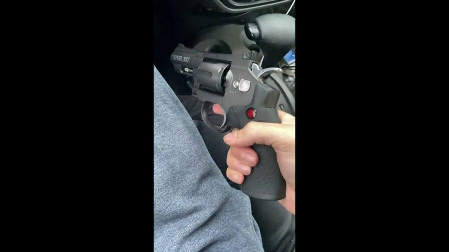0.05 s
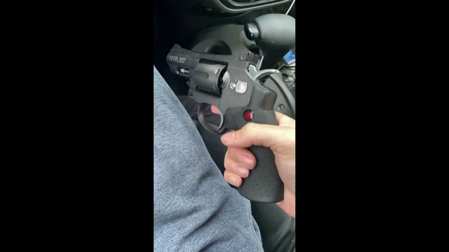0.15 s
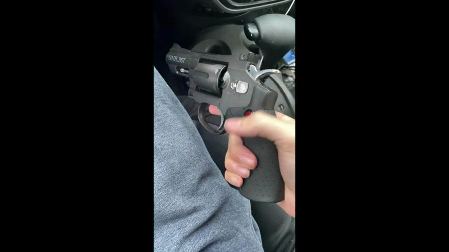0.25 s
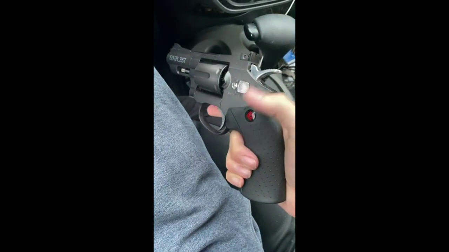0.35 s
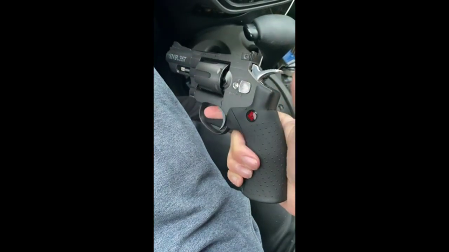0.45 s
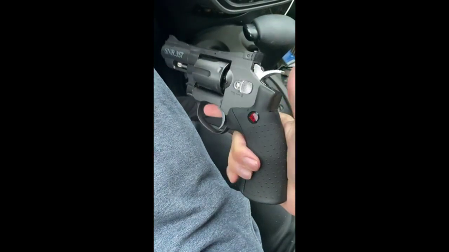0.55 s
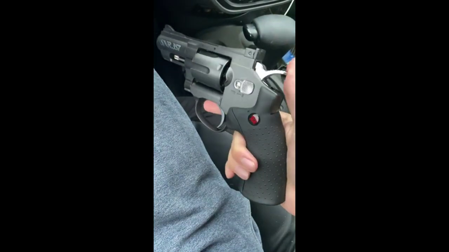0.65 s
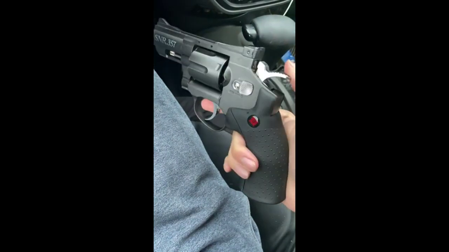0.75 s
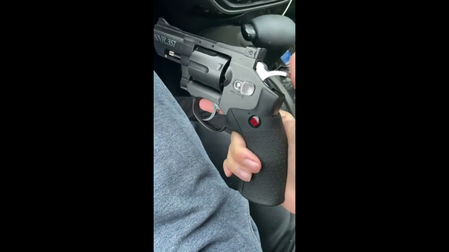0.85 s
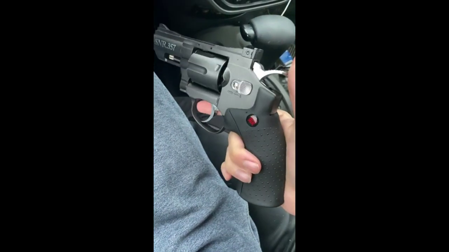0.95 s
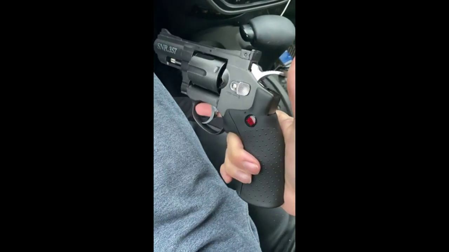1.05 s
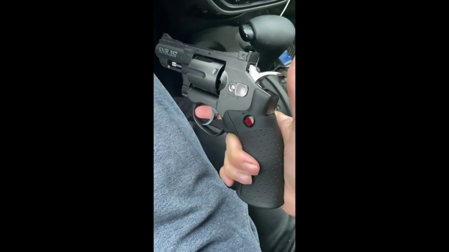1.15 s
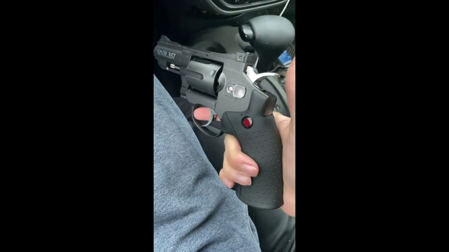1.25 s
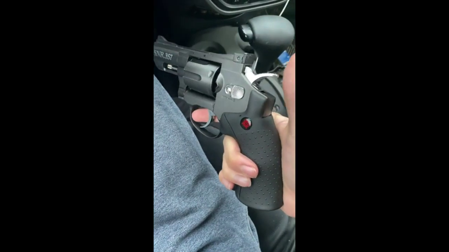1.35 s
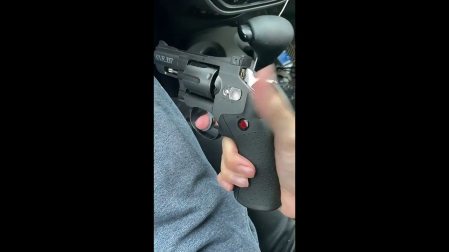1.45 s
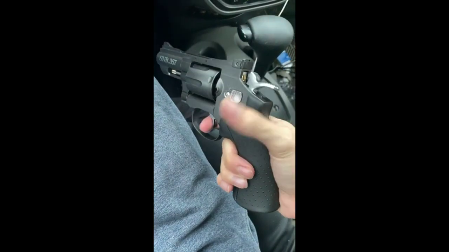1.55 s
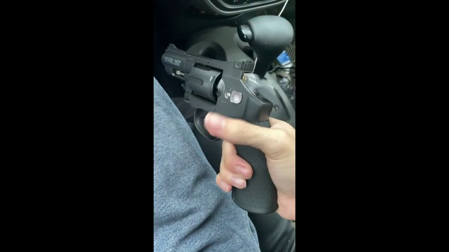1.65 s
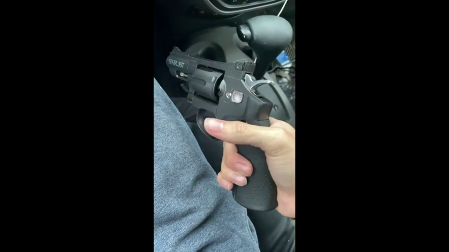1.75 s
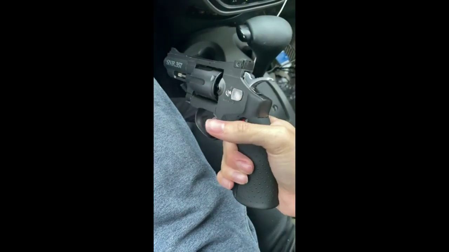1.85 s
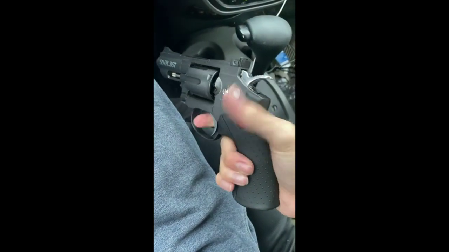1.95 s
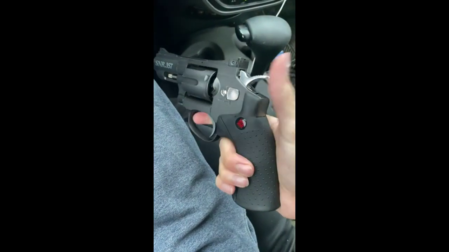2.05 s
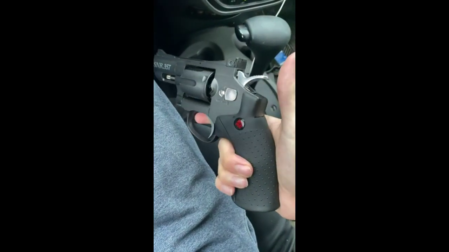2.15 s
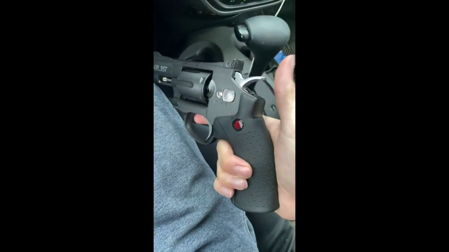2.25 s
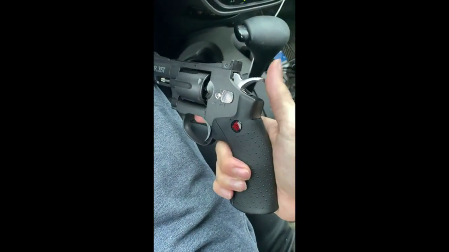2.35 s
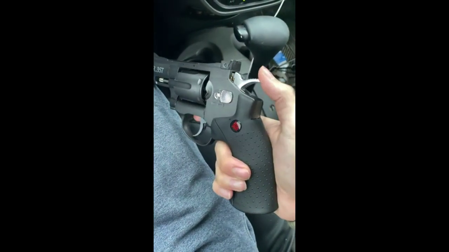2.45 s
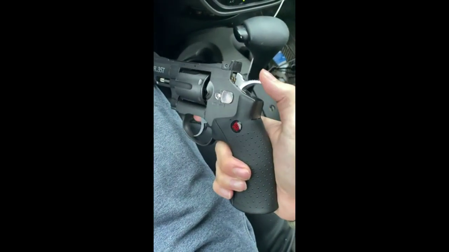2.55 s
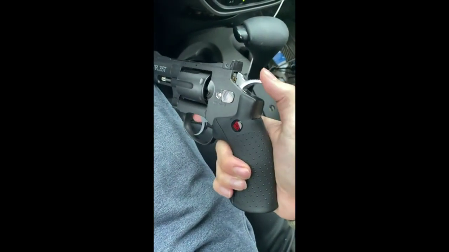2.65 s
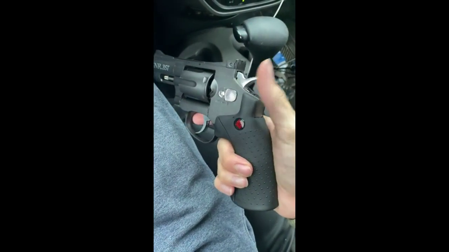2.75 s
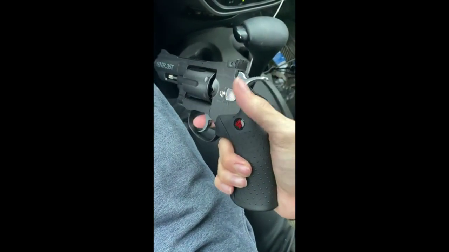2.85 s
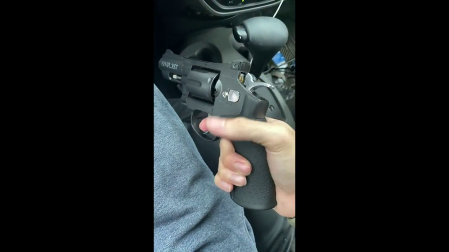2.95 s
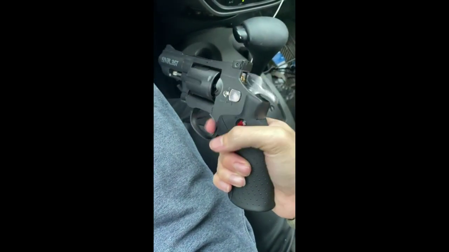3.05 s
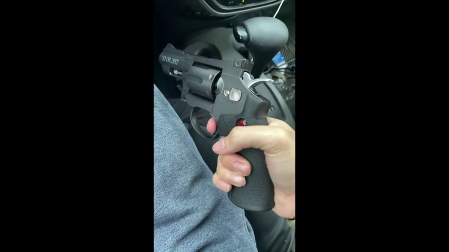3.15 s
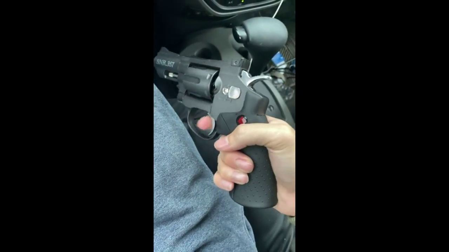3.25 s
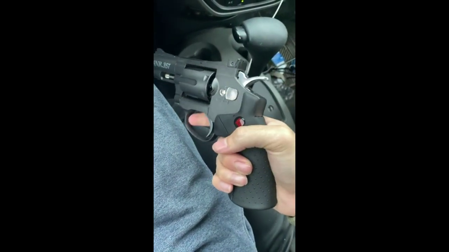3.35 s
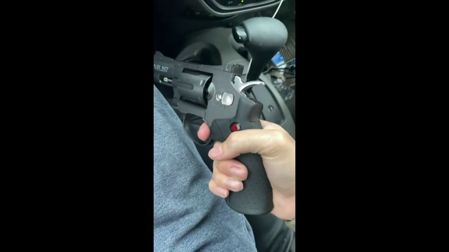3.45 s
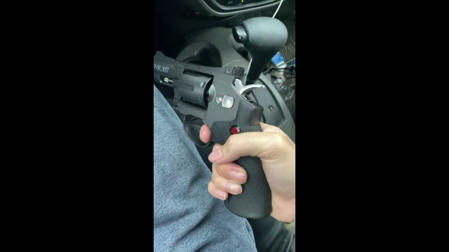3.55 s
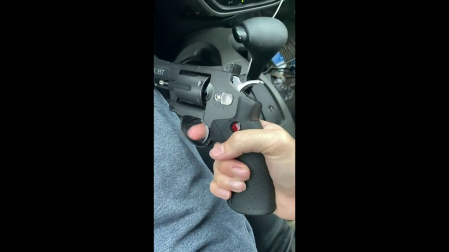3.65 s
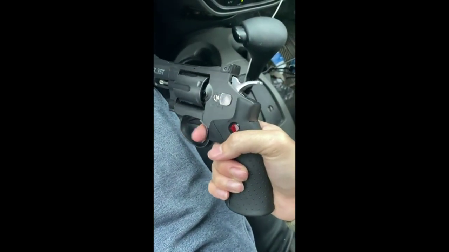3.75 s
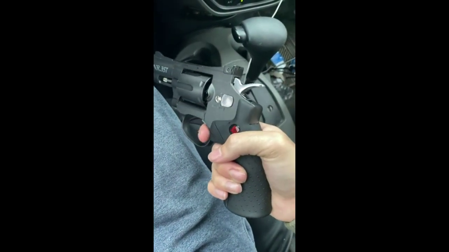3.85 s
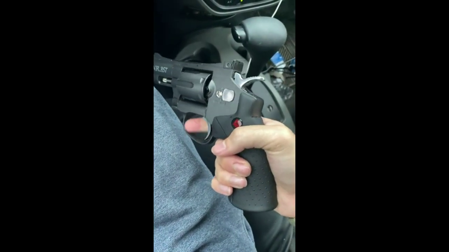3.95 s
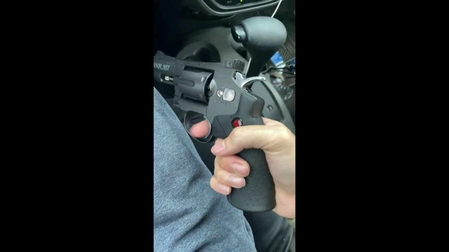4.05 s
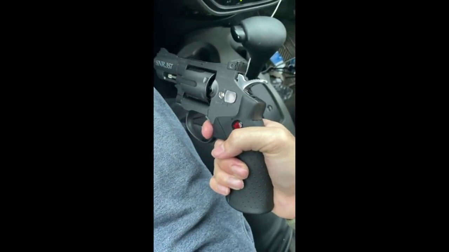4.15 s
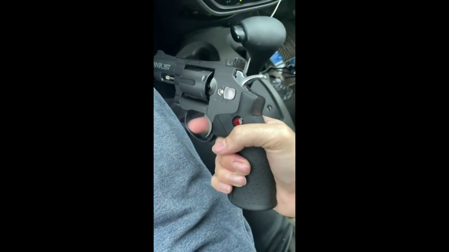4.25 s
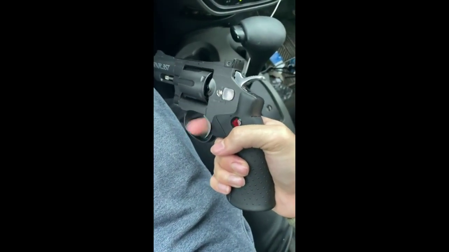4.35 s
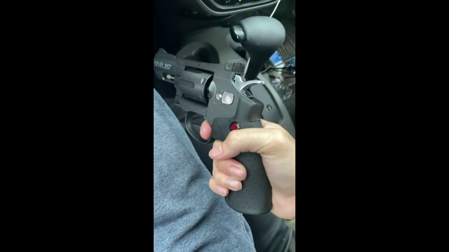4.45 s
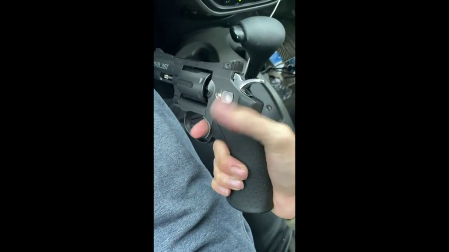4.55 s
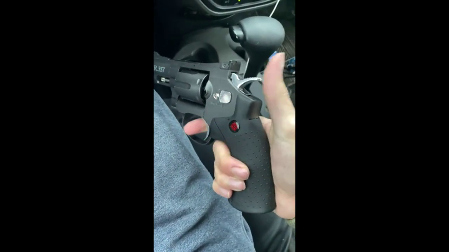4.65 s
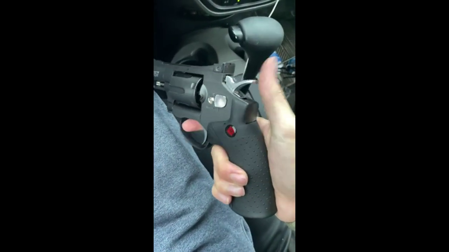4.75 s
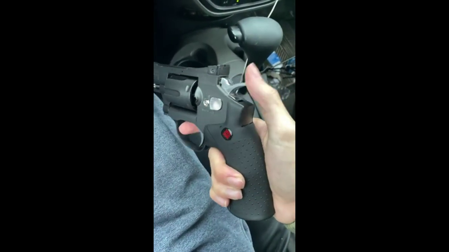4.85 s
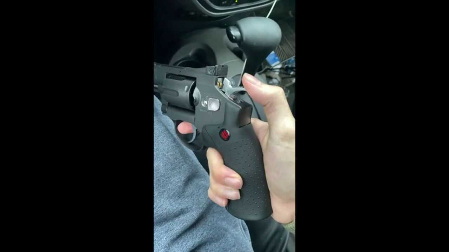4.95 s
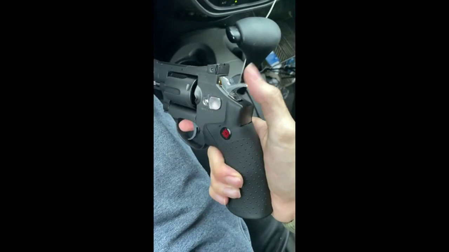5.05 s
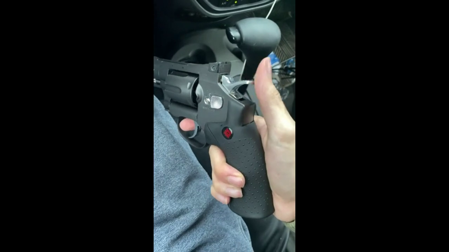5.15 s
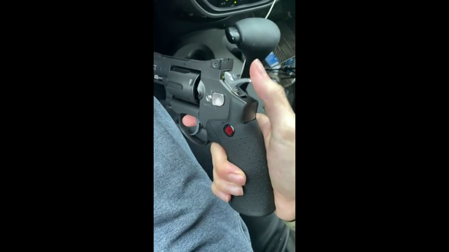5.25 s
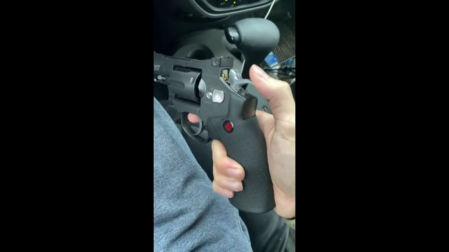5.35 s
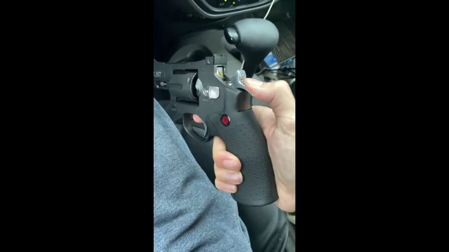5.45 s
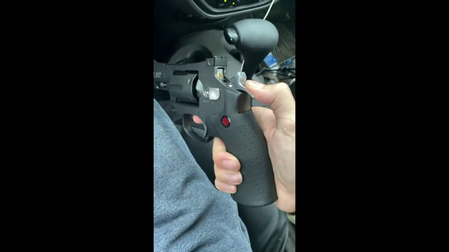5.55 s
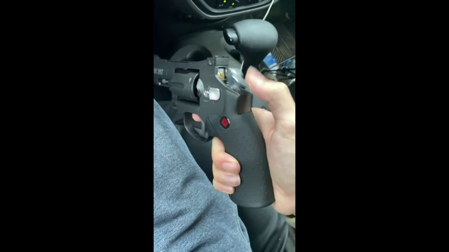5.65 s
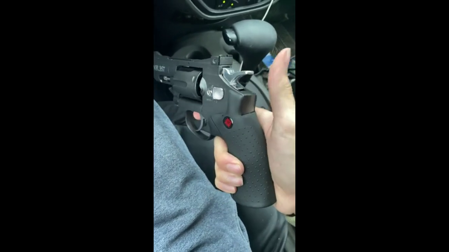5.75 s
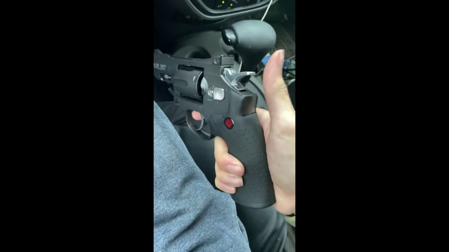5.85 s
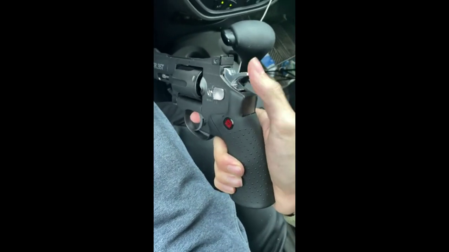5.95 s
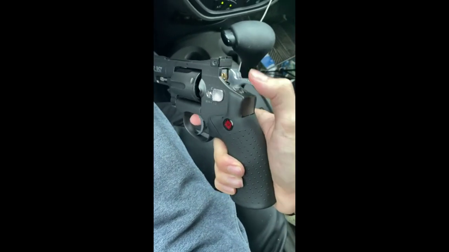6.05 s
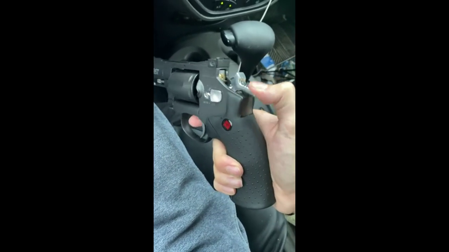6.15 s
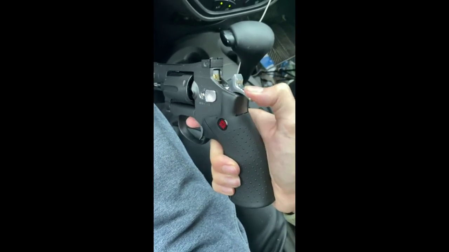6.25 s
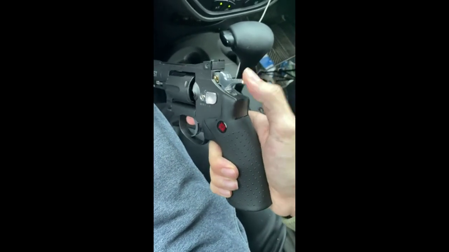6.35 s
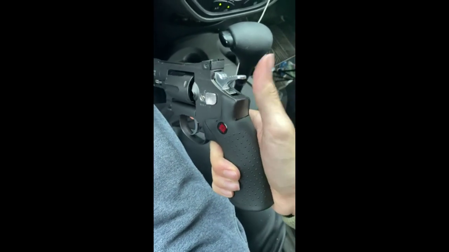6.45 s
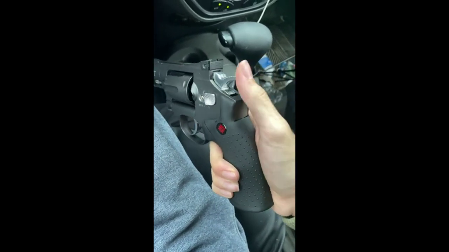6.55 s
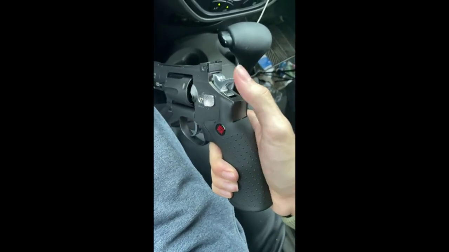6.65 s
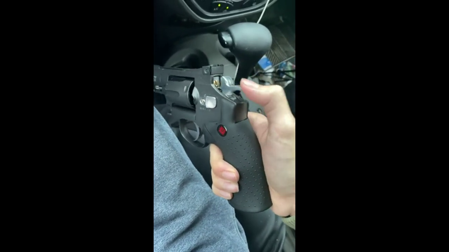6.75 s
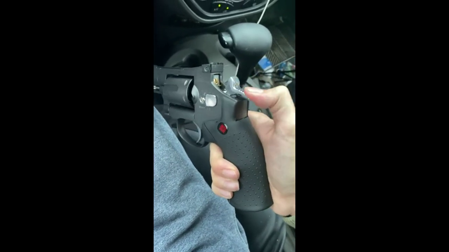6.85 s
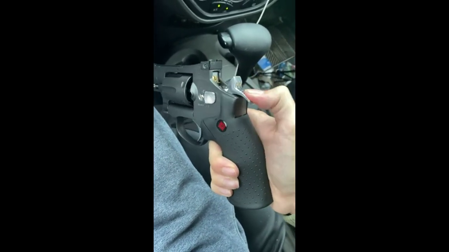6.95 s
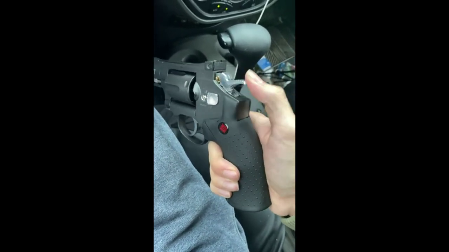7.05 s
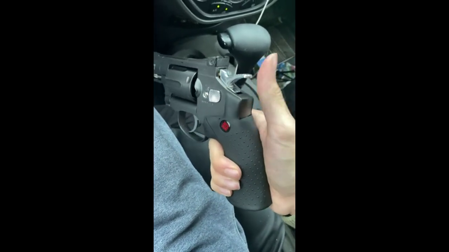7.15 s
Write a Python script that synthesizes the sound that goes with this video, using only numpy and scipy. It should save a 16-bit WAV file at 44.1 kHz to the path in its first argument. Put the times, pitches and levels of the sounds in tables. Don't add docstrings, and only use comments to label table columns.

```python
import sys
import numpy as np
from scipy import signal
from scipy.fft import rfft, irfft
from scipy.io import wavfile
from scipy.ndimage import uniform_filter1d

SR = 44100
rng = np.random.default_rng(int(sys.argv[2]) if len(sys.argv) > 2 else 0)


def convert_level_to_amplitude(level_db):
    exponent = np.asarray(level_db, float) / 20
    return 10 ** exponent


def materialize(psi):
    bounded = np.clip(np.atleast_2d(psi).T, -1, 1)
    quanta = np.round(bounded * 32767).astype(np.int16)
    wavfile.write(sys.argv[1], SR, quanta)


N = 317520

# frequency in Hz, density in dB per Hz.
CONTACT_COLOUR = [(180, -49.5), (300, -22.5), (1270, -14.5), (1800, -10), (2900, -2.5), (4200, -8),
                  (5740, -3.5), (7260, -8.5), (9650, -10), (12400, -15), (13700, -11), (15200, -7),
                  (16500, -31)]


def curve(table, hz, order=1):
    table = np.array(table)
    return np.interp(np.log(hz + 1), np.log(table[:, 0]), table[:, order])


def unit(x):
    return x / np.sqrt(np.mean(np.abs(x) ** 2))


def decay(age, t60):
    return np.exp(-np.log(1000) * age / t60)


def drift(rate):
    noise = rng.standard_normal(N) + 1j * rng.standard_normal(N)
    pole = np.exp(-2 * np.pi * rate / SR)
    return unit(signal.lfilter([1], [1, -2 * pole, pole ** 2], noise))


def air():
    # frequency in Hz, density in dB per Hz.
    air_colour = [(22, -10.5), (34, -13), (50, -2), (90, -2), (200, -11), (330, -16), (420, -14),
                  (650, -24), (1050, -27.5), (2000, -40), (3300, -48), (5000, -67), (7400, -71.5),
                  (10000, -56), (13000, -66.5), (16000, -86)]
    # frequency in Hz, likeness -1..1, left minus right in dB.
    port_likeness = [(61, 0.57, 0.9), (132, 1, -0.5), (292, 0.7, -0.5), (420, 0.55, -5), (700, -0.31, 0.5),
                     (1267, -0.33, 4), (2400, 0.36, -2.5), (7200, -0.11, 0)]
    hz = np.fft.rfftfreq(N, 1 / SR)
    like = np.clip(curve(port_likeness, hz, order=1), -1, 1)
    lean = convert_level_to_amplitude(curve(port_likeness, hz, order=2) / 2)
    mid, side = rfft(rng.standard_normal((2, N)))
    mid = mid * np.sqrt(1 + like)
    side = side * np.sqrt(1 - like)
    both = np.array([(mid + side) * lean, (mid - side) / lean]) * convert_level_to_amplitude(curve(air_colour, hz))
    out = 0
    for centre in 60 * 2. ** np.arange(9):
        octaves_away = np.abs(np.log2(np.clip(hz, 60, 15360) / centre))
        region = irfft(both * np.clip(1 - octaves_away, 0, 1), N)
        flicker_db = (2.5 + centre / 4000) * drift(5.2).real
        out = out + region * convert_level_to_amplitude(flicker_db)
    return convert_level_to_amplitude(-44) * unit(out)


def engine():
    # frequency in Hz, level in dB rms, wavering share 0-1, waver rate per second.
    drone_lines = [(25, -52, .4, 3), (48.22, -27.5, 0.16, 12), (71.36, -40, 0.7, 1.4),
                   (97.1, -50.5, 1, 2.5), (123.7, -50, 0.3, 1.9), (143, -55, 0.7, 1.3),
                   (167.8, -55, 0.4, 2.5), (196, -59, .6, 3.8), (246.9, -63, 0.1, 9),
                   (375.2, -53.5, .5, 12)]
    out = 0
    speed = np.cumsum(1 + .0015 * drift(.7).real) / SR
    for hz, db, share, rate in drone_lines:
        pan_db = -5 * (hz / 374) ** 2
        share = np.clip(share, 0, 1)
        size = np.sqrt(1 - share ** 2) + share * drift(rate)
        phase = 2 * np.pi * (hz * speed + rng.random())
        line = np.sqrt(2) * (size * np.exp(1j * phase)).real
        out = out + convert_level_to_amplitude(db + np.array([[pan_db], [-pan_db]]) / 2) * line
    return out


def phone_bumps():
    # start in seconds, level in dB, frequency in Hz, t60 in seconds.
    bumps = [
        (6.786, -17.5, 69.1, .15),
        (7.16, -14, 68, 0.073),
    ]
    t, out = np.arange(N) / SR, 0
    for s, db, hz, t60 in bumps:
        age = np.maximum(t - s, 0)
        onset = 1 - np.exp(-age / 0.0039)
        out = out + convert_level_to_amplitude(db) * np.sin(2 * np.pi * hz * age) * decay(age, t60) * onset
    return out


def jolts(push_ms=.7):
    # start in seconds, level in dB.
    landings = [
        (.689, -33),
        (1.62, -30),
        (2.445, -28),
        (3.05, -29),
        (4.841, -25),
        (6.85, -32.5),
    ]
    t, out = np.arange(N) / SR, 0
    for s, db in landings:
        age = np.clip(t - s, 0, .1) * 1000 / push_ms
        out = out + convert_level_to_amplitude(db) * np.e * age * (2 - age) * np.exp(-age)
    return out * convert_level_to_amplitude(np.array([[-2.5], [2.5]]))


def scrapes():
    # start in seconds, release in seconds, level at release in dB.
    slides = [(0.666, 0.682, -29.5), (1.427, 1.452, -72), (1.577, 1.588, -51), (2.421, 2.438, -35),
              (2.993, 3.022, -65), (4.823, 4.834, -29), (5.237, 5.261, -45), (5.395, 5.414, -29),
              (5.592, 5.65, -25), (5.965, 6.006, -54), (6.634, 6.645, -67), (6.981, 7.016, -40.5)]
    # start in seconds, end in seconds, level in dB.
    rustles = [(0.842, 0.917, -87), (1.473, 1.567, -79), (2.682, 2.91, -82), (4.81, 4.829, -63.5),
               (4.947, 5.2, -86.5), (5.26, 5.404, -74), (5.701, 5.95, -92), (6.04, 6.11, -77),
               (6.19, 6.294, -78), (6.386, 6.592, -88), (6.727, 6.797, -69), (6.9, 6.98, -78),
               (7.076, 7.146, -78)]
    # start in seconds, end in seconds, level in dB.
    drags = [(5.997, 6.034, -57), (6.11, 6.165, -41.5), (6.287, 6.352, -46), (6.648, 6.665, -57),
             (7.016, 7.054, -44)]
    strokes = [(start, end, -67, db) for start, end, db in slides]
    strokes += [(start, end, db, db) for start, end, db in [*rustles, *drags]]
    t, size = np.arange(N // 16 + 1) * 16 / SR, 0
    for start, end, start_db, end_db in strokes:
        times = [start - .004, start, end, end + .006]
        size = size + convert_level_to_amplitude(np.interp(t, times, [-110, start_db, end_db, -110]))
    grit = rng.standard_normal((3, N))
    hz = np.fft.rfftfreq(N, 1 / SR)
    colour = convert_level_to_amplitude(curve(CONTACT_COLOUR, hz)) / (1 + (hz / 7000) ** 2)
    hiss = irfft(rfft(grit[:2]) * colour, N)
    lumps = convert_level_to_amplitude(22.0 * uniform_filter1d(grit[2], size=60))
    return unit(hiss) * np.repeat(size, 16)[:N] * lumps


def rings():
    # start in seconds, frequency in Hz, level in dB, t60 in seconds.
    free_rings = [(.689, 2170, -29, 0.078), (1.61, 12500, -26.5, 0.047), (1.621, 2126, -24.5, 0.1),
                  (2.445, 2214, -29.5, 0.06), (3.051, 2100, -20.5, 0.072), (4.84, 5300, -64, .7),
                  (5.65, 5260, -67, 0.39), (6.155, 5250, -67, 0.36), (5.421, 12510, -19, 0.12),
                  (5.646, 2105, -22.5, 0.048), (6.347, 2135, -33, 0.048), (1.612, 5800, -26, 0.03),
                  (2.915, 5580, -24, 0.028), (3.042, 5500, -24, .03), (5.645, 6010, -17, 0.03),
                  (6.153, 4960, -29, 0.035), (6.848, 5800, -20, .03)]
    out, age = np.zeros(N + 22050), np.arange(22050) / SR
    flutter = drift(160)
    for s, hz, db, t60 in free_rings:
        at = int(s * SR)
        wobble = 1 + np.roll(flutter, -at)[:len(age)] * (2900 / hz) ** 2
        swing = (wobble * np.exp(2j * np.pi * hz * age)).imag
        out[at:at + len(age)] += convert_level_to_amplitude(db) * swing * decay(age, t60) * (1 - np.exp(-age / .001))
    return np.array([out[:N] * convert_level_to_amplitude(-1.5), np.roll(out, shift=2)[:N]])


def contacts():
    # start in seconds, blow level in dB,
    # frame thud in dB relative, bright tick in dB relative, scrape length in ms.
    snaps = [(0.6825, -23, -6.5, 10, .8), (0.6846, -20, -20.5, 6, 1.5), (0.6873, -13.5, -5, 3.5, 3.6),
             (1.6075, -22, -7.5, 1.5, 1.2), (1.6112, -15.5, 0, 9.5, 1.7), (1.6198, -12.5, -7, 2, 2.4),
             (1.6538, -28.5, -1.5, -9.5, 1.8), (2.4415, -14.5, -10, 5, 1.1), (2.4443, -13.5, -7, -1.5, 1.8),
             (3.0231, -26.5, -6.5, 3, 2.5), (3.0374, -25, -1, 6, 1.9), (3.0405, -14.5, -3.5, 5, .7),
             (3.0503, -11.5, -5.5, 3, 1.9), (3.0814, -28.5, 4.5, -14, 1.4), (4.8354, -17, 0.5, 5.5, 1.3),
             (4.838, -16, -4, 8.5, 5.2), (5.4205, -24, 2, 13.5, 1.7), (5.423, -16, 0, -14, 3),
             (5.6402, -29.5, -5, 14.5, 1.3), (5.6455, -19, -3, -25.5, 2.2), (6.8425, -32, -2.5, 9, 1.1),
             (6.8468, -14.5, -8, 2, 1.6), (6.8543, -19, -1.5, -5, 1.1)]
    # start in seconds, level in dB, bright tick in dB relative.
    catches = [(0.824, -40.5, 3.5), (0.8333, -36, -14), (1.4449, -43, 8), (1.4534, -37.5, 4),
               (1.5907, -26.5, 3.5), (1.6251, -19, -3.5), (2.6712, -44, -1.5), (2.9122, -35.5, 2.5),
               (2.9152, -35.5, 4.5), (5.0236, -46, 4.5), (5.0582, -40.5, 0), (5.2568, -43, -9),
               (5.4022, -33, 1.5), (5.6148, -35, 2), (5.6339, -33, 4.5), (6.0005, -31, 7),
               (6.115, -35.5, 8.5), (6.13, -31.5, -20.5), (6.1364, -20.5, 2.5), (6.153, -26, -8.5),
               (6.2928, -36.5, 6.5), (6.3057, -35.5, 9.5), (6.3187, -30, -1.5), (6.3407, -26, 2.5),
               (6.6625, -39, -12.5), (6.6862, -42, 14), (6.7994, -37, 4), (7.0142, -31, 12),
               (7.0388, -35, 3), (7.0545, -36, 1)]
    # start in seconds, level in dB, bright tick in dB relative.
    taps = [(0.252, -69.5, 5), (1.4626, -46, -2.5), (1.5542, -61.5, 5), (1.7795, -58, -1.5),
            (2.4096, -58, -9), (2.622, -60, -19), (2.6573, -54, -4), (2.8318, -49, -14.5),
            (3.1802, -53, 0.5), (3.4675, -56, 2), (3.5842, -51.5, -0.5), (3.775, -57.5, 0),
            (3.879, -56.5, -7), (3.9642, -55.5, 0.5), (4.0805, -58, -3), (4.1899, -55.5, -1.5),
            (4.2727, -56.5, 2.5), (4.3795, -63, 1.5), (4.4899, -60.5, 6), (5.05, -51, -16),
            (5.2911, -50, -6), (5.3044, -62, -19), (5.332, -52, 2.5), (5.9386, -63, -6),
            (5.9801, -44.5, -7), (6.032, -46, -13), (6.6503, -47, -3), (6.709, -47.5, -16),
            (6.7217, -50.5, -20), (7.081, -52, -7)]
    light = [(s, db, -2.5, tick_db, 0.89) for s, db, tick_db in catches]
    light += [(s, db, 4.5, tick_db, 0.92) for s, db, tick_db in taps]
    gaps = .006 * (.5 + rng.random(len(light)))
    rebounds = []
    for (s, db, thud_db, tick_db, ms), gap in zip(light, gaps):
        rebounds.append((s + gap, db - 8.5, thud_db, tick_db - 8, ms))
    return [*snaps, *light, *rebounds]


def ring(modes, t, chance, scatter_db=3.0, detune=.01):
    hz, db, t60 = np.transpose(modes)[:, :, None]
    gain_chance = chance[:len(modes), None]
    pitch_chance = chance[10:10 + len(modes), None]
    tones = np.sin(2 * np.pi * hz * (1 + detune * pitch_chance) * t)
    waves = convert_level_to_amplitude(db + scatter_db * gain_chance) * tones * decay(t, t60)
    return waves.sum(axis=0)


def action(lead_db=-26, rattle_db=-9, rattle_t60=0.086, left_db=-1.5, metal_t60=.04, metal_db=3.5):
    # frequency in Hz, level in dB, t60 in seconds.
    frame_modes = [(1050, -11, .02), (2130, -7, .035), (2450, -9, .025), (2760, -11, .025)]
    cylinder_modes = [(4160, -11, .015), (5290, -9, .02), (5800, -11, .012)]
    hammer_modes = [(9660, -11, 0.0042), (12500, -11.5, 0.025)]
    # frequency in Hz, lead in radians.
    port_lead = [(0, -3.5), (600, 2.5), (1290, 0.08), (2150, 0.14), (2930, 0.5), (3880, 1.5), (5600, 1.27),
                 (6550, -3), (8100, 4), (9470, 5), (11000, 7), (13000, 7), (13900, 7.5), (16400, 14)]
    out, t = np.zeros((2, N + 9000)), np.arange(4096) / SR
    hz = np.fft.rfftfreq(8192, 1 / SR)
    colour = convert_level_to_amplitude(curve(CONTACT_COLOUR, hz))
    lead = np.interp(hz, *np.transpose(port_lead))
    left = convert_level_to_amplitude(left_db / 2) * np.exp(.5j * lead)
    right = convert_level_to_amplitude(-left_db / 2) * np.exp(-.5j * lead)
    ports = np.array([left, right])
    rattle_dulling = np.sqrt(1 + (hz / 9000) ** 2)
    age = t - 1024 / SR
    after = np.maximum(age, 0)
    for s, db, thud_db, tick_db, ms in contacts():
        chance, grit = rng.standard_normal((3, 20)), rng.standard_normal((6, 4096))
        scrape_ms = max(ms, .2)
        blow = (1 - np.exp(-after / 0.0001)) * np.exp(-after * 1000 / scrape_ms)
        slide = convert_level_to_amplitude(lead_db) * np.exp(np.minimum(age, 0) / .004) * (age < 0)
        push = grit[0] * convert_level_to_amplitude(5.53 * grit[1] - 2.5)

        lasting = rattle_t60 * np.clip(2.5 + (db + 23.5) / 90, .4, 1)
        fade = convert_level_to_amplitude(rattle_db + 0.3 * (db + 16)) * decay(after, lasting) * (age >= 0)
        rattle = grit[2:4] * fade * convert_level_to_amplitude(18.0 * uniform_filter1d(grit[4], size=40))
        metal = grit[5] * decay(t, metal_t60)
        metal = rfft(metal, 8192) / np.sqrt(np.sum(metal ** 2))
        metal = (1 + convert_level_to_amplitude(metal_db) * metal) / np.sqrt(1 + convert_level_to_amplitude(2 * metal_db))

        body = convert_level_to_amplitude(thud_db) * ring(frame_modes, t, chance[0])
        body += ring(cylinder_modes, t, chance[1])
        body += convert_level_to_amplitude(tick_db) * ring(hammer_modes, t, chance[2])
        rung = rfft(push * blow, 8192) * convert_level_to_amplitude(-20.5) * rfft(body, 8192) * ports

        tilt_db = np.interp(hz, [2800, 3700, 6100, 7500], [thud_db, 0, 0, tick_db])
        crack = rfft(push * (blow + slide), 8192) * ports
        crack = crack + rfft(rattle, 8192) * metal / rattle_dulling
        crack = crack * convert_level_to_amplitude(14.0 + tilt_db) * colour
        at = int(s * SR) - 1054
        hit = irfft(rung + crack)[:, :7000]
        out[:, at:at + 7000] += convert_level_to_amplitude(db) * hit * np.sqrt(2 / scrape_ms)
    return out[:, :N]


def cabin(x, t60=.06, wet_db=-12):
    t = np.arange(6000) / SR
    tails = rng.standard_normal((2, 6000)) * decay(t, t60) * (1 - np.exp(-t / .002))
    tails = tails * convert_level_to_amplitude(wet_db) / np.sqrt(np.sum(tails ** 2, axis=1, keepdims=True))
    return x + signal.fftconvolve(x, tails, axes=1)[:, :N]


def scene():
    gun = action() + rings() + scrapes() + jolts()
    return cabin(gun) + engine() + phone_bumps() + air()


def roll_off(x):
    return signal.sosfilt(signal.butter(12, 16810, fs=SR, output="sos"), x)


def record(dry):
    # start in seconds, depth in dB.
    ducks = [
        (0.716, -7),
        (1.637, -9),
        (2.472, -11.5),
        (3.068, -9),
        (4.862, -12.5),
        (6.87, -1.5),
    ]
    # centre frequency in Hz, width in Hz, depth in dB.
    thin_bands = [(3200, 380, -5), (7450, 450, -13), (13700, 600, -8)]
    t, gain_db = np.arange(N) / SR, 0
    hold_s, back_s = .056, 0.086
    duck_times = [0, .012, 0.0086 + hold_s, 0.0085 + hold_s + back_s]
    for s, depth_db in ducks:
        gain_db = gain_db + depth_db * np.interp(t - s, duck_times, [0, 0.71, .85, 0])
    edges = np.clip(np.minimum(t, t[::-1]) / .002, 0, 1)
    hz = np.fft.rfftfreq(N, 1 / SR)
    dips_db = sum(dip * np.exp(-((hz - centre) / width) ** 2) for centre, width, dip in thin_bands)
    dry = irfft(rfft(dry) * convert_level_to_amplitude(dips_db), N)
    top_cut = signal.ellip(6, .2, 40, 15900, fs=SR, output="sos")
    held = signal.sosfilt(top_cut, dry * convert_level_to_amplitude(gain_db) * edges)
    return roll_off(1.1 * np.tanh(held / 1.1))


dry = scene()
out = record(dry)
materialize(out)
```